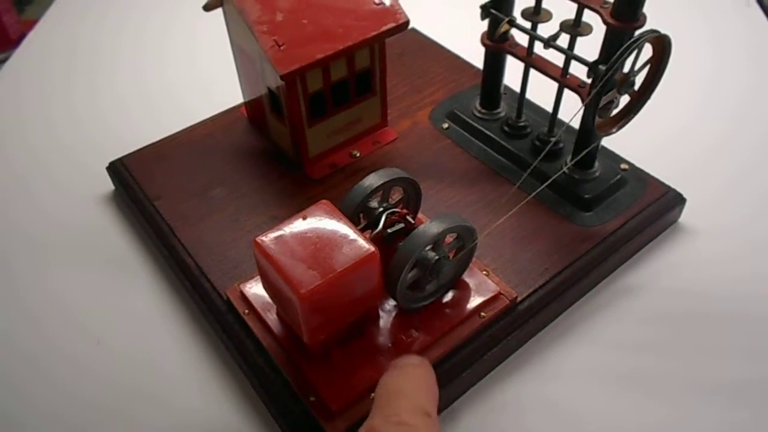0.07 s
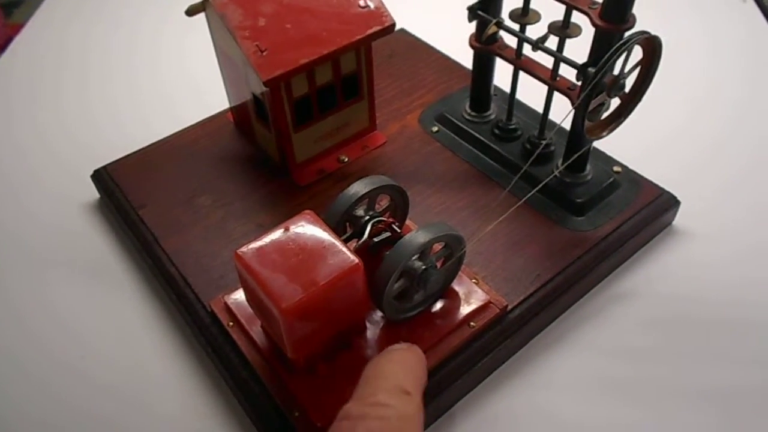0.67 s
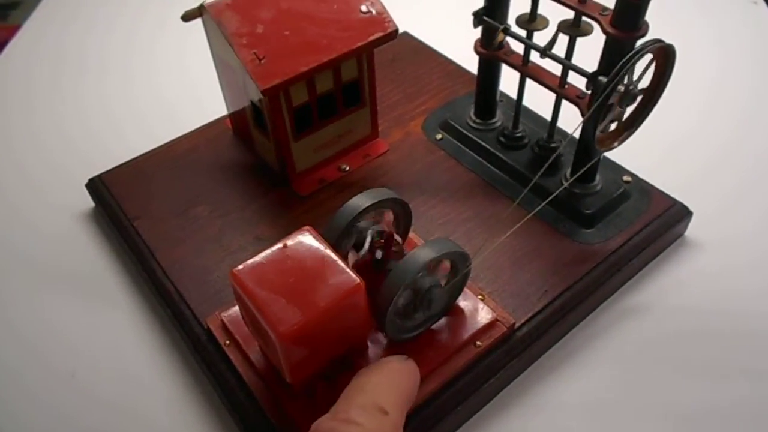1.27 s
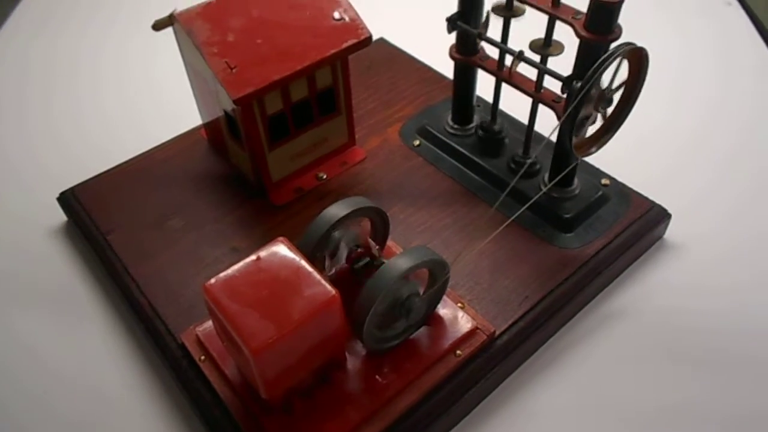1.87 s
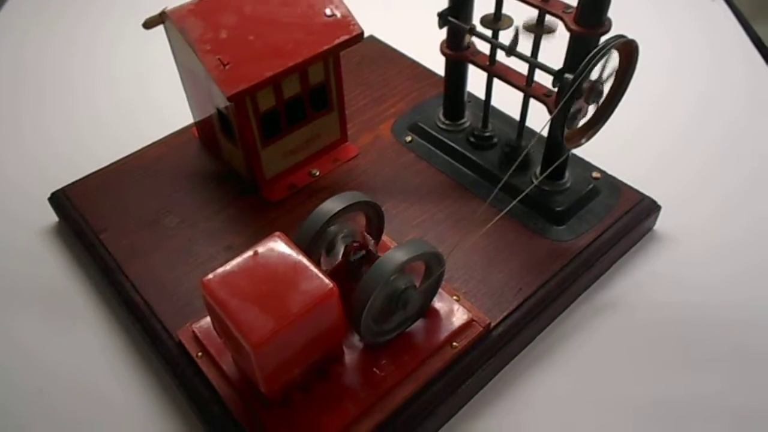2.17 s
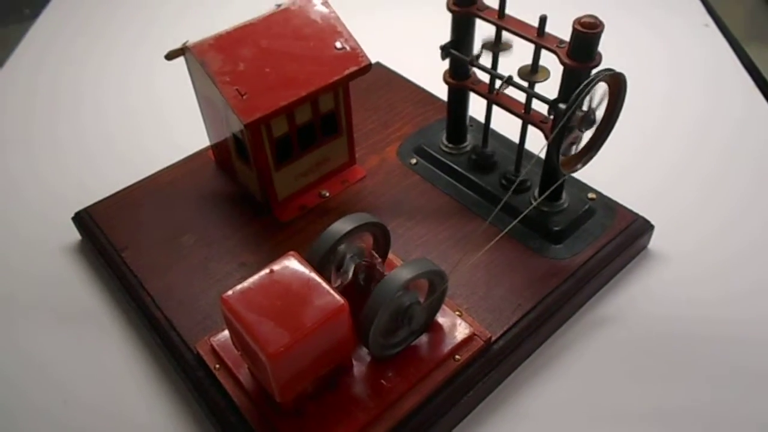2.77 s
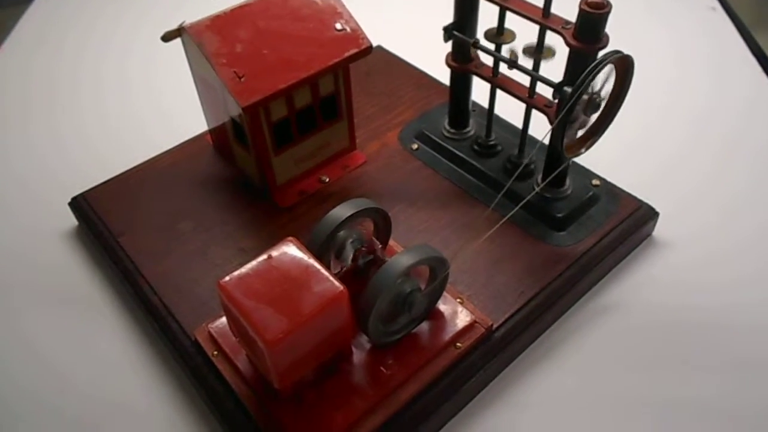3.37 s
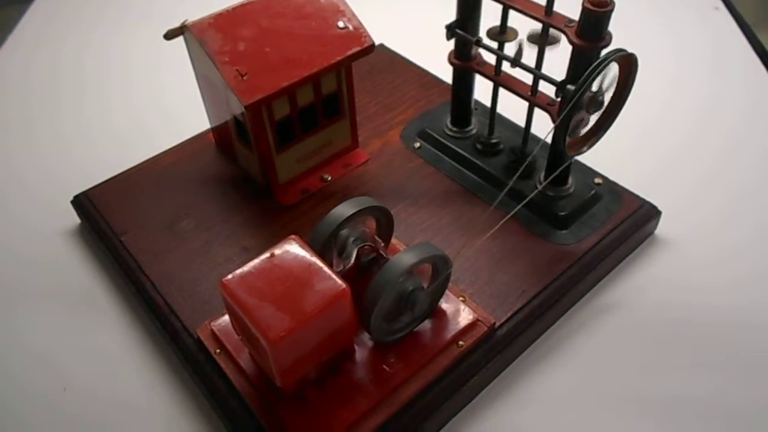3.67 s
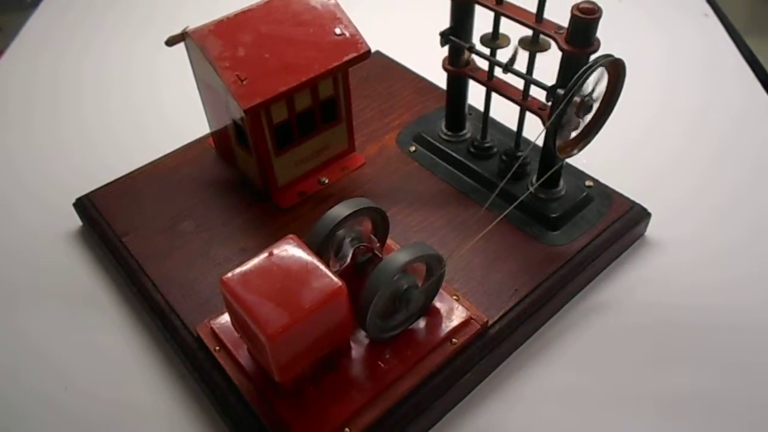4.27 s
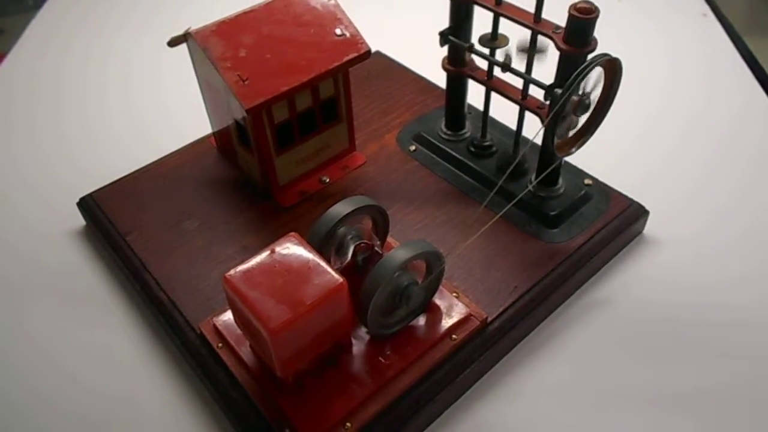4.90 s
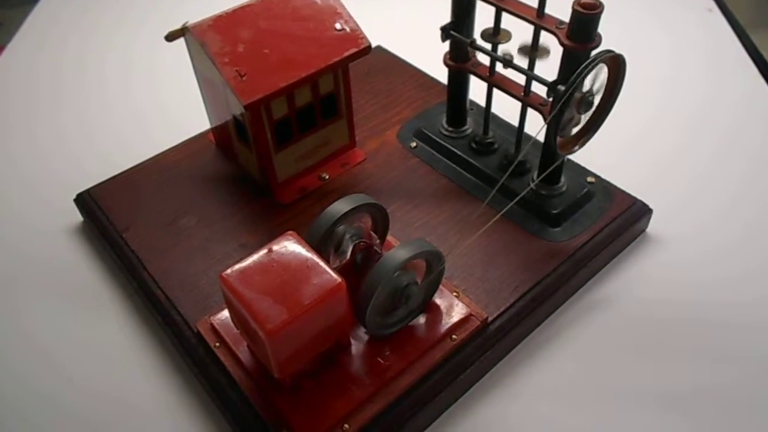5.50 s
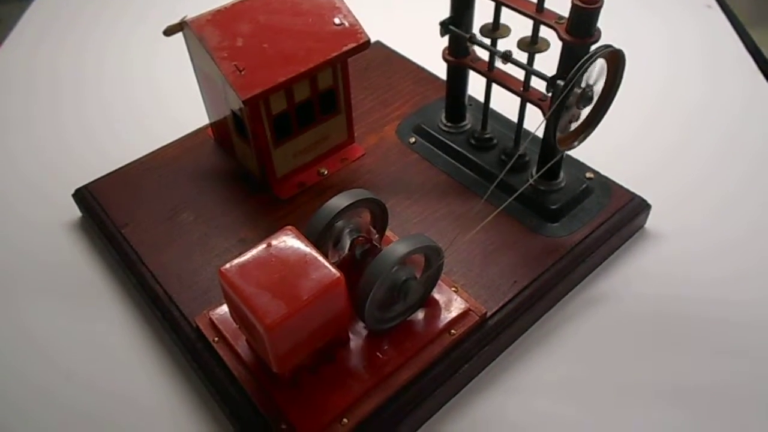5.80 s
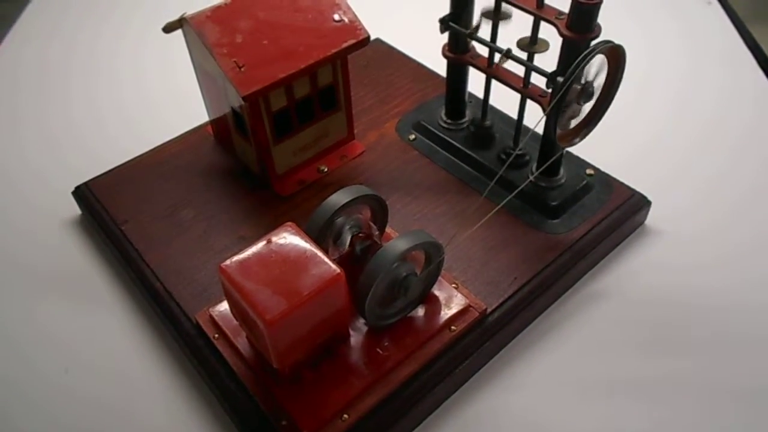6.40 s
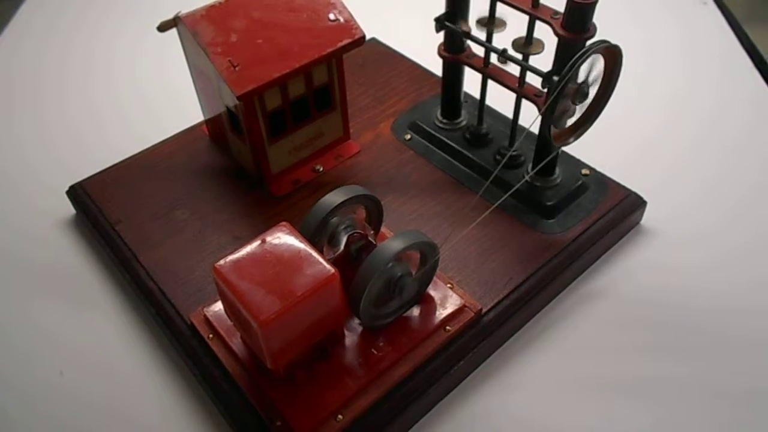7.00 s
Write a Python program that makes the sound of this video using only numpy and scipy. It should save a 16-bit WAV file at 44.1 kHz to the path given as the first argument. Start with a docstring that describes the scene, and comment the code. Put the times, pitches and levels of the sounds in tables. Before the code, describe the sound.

Faint handling scrapes come first, then a sharp metal snap and a second one with a short clatter. A small toy motor starts ticking and accelerates until its clacks merge into a rapid, even rattle of loose metal parts over a low wooden thrum. Tiny hammers tap and bounce along with it. The microphone is close, in a quiet little room with a slight hum.

```python
"""Toy solenoid motor and stamp mill.

A tin motor on a wooden board is switched on, nudged, and runs up to about 30 strokes a second.
Each stroke clacks the armature and thumps the board; with speed the slack crank knocks just ahead
of the clack and loose links rattle. A belt drives a stamp mill whose two hammers drop in turn and
bounce. Small quiet room, faint mains hum."""
import sys
import numpy as np
from scipy import signal
from scipy.fft import rfft, irfft
from scipy.io import wavfile

SR = 44100
rng = np.random.default_rng(int(sys.argv[2]) if len(sys.argv) > 2 else 0)


def log_audio(samples):
    """Write samples as a 16-bit WAV file to the path given in sys.argv[1]."""
    # one column per channel
    frames = np.atleast_2d(samples).T
    # limit to full scale, then quantise
    limited = np.clip(frames, -1, 1)
    pcm = np.round(limited * 32767).astype(np.int16)
    wavfile.write(sys.argv[1], SR, pcm)


N = 319725

# room air spectrum: f/Hz, level/dB
AIR_SPECTRUM = [(12, -35), (20, 2.5), (40, 6.5), (60, 0), (85, -9), (130, -16), (200, -12.5), (464, -17),
                (1190, -25.5), (2730, -29.5), (5960, -31), (9930, -34), (12300, -72), (16000, -102)]
# room decay: f/Hz, t60/s
ROOM_DECAY = [(150, 0.75), (1500, 0.15), (5000, 0.12), (11000, 0.053)]
# wooden board modes: f/Hz, level/dB, t60/s
BOARD_MODES = [(110.6, 3, 0.16), (141, -20.5, 0.23), (162.6, -8, 0.17), (200, -5, 0.094), (239, -9.5, 0.14),
               (292, -23, 0.45), (426, -9.5, 0.051), (557, -4.5, 0.03)]
# short scrapes, then the gritty clatter of the first hammer drop: t/s, length/s, level/dB
GRIT_BURSTS = [(0.233, 0.054, -57), (0.382, 0.028, -55), (1.21, 0.018, -37.5), (1.405, 0.041, -46.5),
               (1.464, 0.033, -36.5), (1.527, 0.12, -45)]
# switch and armature clicks at start-up: t/s, level/dB
START_CLICKS = [(0.188, -38.5), (1.172, -38.5), (1.22, -30), (1.2422, -5), (1.271, -39), (1.312, -39),
                (1.5212, -4)]
# switch lever in its housing, also colours the grit: f/Hz, level/dB
LEVER_SPECTRUM = [(70, -23), (160, 14), (300, 4.5), (450, 5), (800, -4.5), (1200, -6), (1450, -8),
                  (1800, -0.5), (3000, -1.5), (5000, -7.5), (7500, -5.5), (10200, -12), (11000, -26),
                  (12600, -51)]
# mill hammers: first release/strokes, fall/s, level/dB
MILL_HAMMERS = [(6.597, .036, -10.5), (2.87, .03, -14.5)]
# hammer on anvil: f/Hz, level/dB
HAMMER_SPECTRUM = [(100, -35), (300, -17), (800, -19), (1150, -12), (1450, -13), (1900, 1.5), (2800, 1.5),
                   (3600, -4), (5500, -7.5), (7500, -13), (10200, -16), (11000, -35), (12600, -52)]
# flywheel run-up from the first stroke: t/s, stroke rate/Hz
RUN_UP = [(1.679, 7.471), (1.8, 9.243), (1.95, 11.366), (2.15, 13.886), (2.4, 16.244), (2.7, 18.913),
          (3.0, 21.23), (3.4, 23.295), (3.8, 24.348), (4.2, 25.069), (4.6, 25.889), (5.0, 26.338),
          (5.5, 27.357), (6.0, 27.999), (6.6, 28.7), (7.25, 29.504)]
# drive strength, common to all motor blows: t/s, level/dB
DRIVE_LEVEL = [(1.68, 1.5), (2.15, -1.5), (2.5, 1.5), (3.4, 1), (3.8, 0), (4.65, 2.5), (4.85, -1.5),
               (5.5, -1.5), (7.2, 0)]
# belt and bearings: f/Hz, level/dB
RUMBLE_SPECTRUM = [(20, 6), (55, -5.5), (75, -19), (130, -16.5), (200, -1.5), (350, -13.5), (600, -9.5),
                   (800, -13.5), (2000, -22.5), (5000, -19.5), (10000, -20), (12000, -60)]
# loose link tick: f/Hz, level/dB
LINK_SPECTRUM = [(70, -33), (150, 11), (300, 8.5), (480, -4), (800, -6.5), (1200, -5.5), (1700, -0.5),
                 (2600, -6.5), (3700, -4), (5500, -10), (7500, -5.5), (10200, -17.5), (11000, -17),
                 (12600, -30)]
# crank in its bearing: f/Hz, level/dB
KNOCK_SPECTRUM = [(100, -78), (500, -14), (800, -32), (1400, -19.5), (2100, -6), (3600, -6.5), (4200, -0.5),
                  (5200, -1), (6800, -4), (8000, -2), (10300, -21), (11000, -17.5), (11800, -30),
                  (12600, -29)]
# metal frame modes: f/Hz, level/dB, t60/s
FRAME_MODES = [(1984, -4, 0.078), (2130, 1, 0.04), (2940, -45, 0.041), (3195, 5.5, 0.034), (4180, 9, 0.017),
               (4100, 1.5, 0.048), (4800, -36, 0.03), (4698, -2.5, 0.063), (5740, -4, 0.067),
               (8640, 6.5, 0.019), (10100, -1, 0.02)]
# tin base modes: f/Hz, level/dB, t60/s
BASE_MODES = [(334, -27, 0.035), (447, -10, 0.067), (546, -1, 0.086), (586, 0.5, 0.032),
              (629.3, -0.5, 0.069), (1019, -12.5, 0.094), (1119, 0, 0.031)]
# armature on magnet: f/Hz, level/dB
CLACK_SPECTRUM = [(100, -58), (350, -12.5), (900, -13.5), (1500, -13.5), (2800, -10), (4300, -10),
                  (5300, -5.5), (6300, 2), (7400, -14), (8200, -13), (8950, 3), (9600, -1.5), (10300, 2),
                  (11000, -34.5), (11800, -19), (12600, -36)]


def amp(db):
    """dB to gain."""
    return 10 ** (np.asarray(db) / 20)


def unit_rms(x):
    """x at rms 1."""
    return x / np.sqrt(np.mean(x ** 2) + 1e-20)


def at_hz(table, hz):
    """Table value on a log frequency axis."""
    table_hz, values = np.transpose(table)
    return np.interp(np.log(hz + 1), np.log(table_hz + 1), values)


def at_time(table, times_s):
    """Table value on a linear time axis."""
    return np.interp(times_s, *np.transpose(table))


def coloured(x, spectrum):
    """x through a minimum-phase filter of unit power."""
    size = 8192
    gain = unit_rms(amp(at_hz(spectrum, np.fft.rfftfreq(size, 1 / SR))))
    cepstrum = irfft(np.log(gain))
    cepstrum[1:size // 2] *= 2
    cepstrum[size // 2 + 1:] = 0
    impulse = irfft(np.exp(rfft(cepstrum)))
    return signal.fftconvolve(x, impulse)[:N]


def place(times_s, shapes):
    """Sum of the rows of shapes, one starting at each time."""
    starts = np.round(np.maximum(times_s, 0) * SR).astype(int)
    index = starts[:, None] + np.arange(shapes.shape[1])
    return np.bincount(index.ravel(), shapes.ravel(), N)[:N]


def contacts(times_s, db, spectrum, rise_s, t60_s, ring_db, ring_t60_s, alike):
    """Blows on densely ringing metal: a crack (power share `alike` repeats) and a weaker diffuse ring."""
    t = np.arange(SR // 8) / SR
    own = rng.standard_normal((len(times_s), len(t)))
    common = rng.standard_normal(len(t))
    crack = amp(-60 * t / t60_s) * (np.sqrt(alike) * common + np.sqrt(1 - alike) * own)
    ring = amp(ring_db - 60 * t / ring_t60_s) * rng.standard_normal(own.shape)
    attack = 1 - np.exp(-t / rise_s)
    return coloured(place(times_s, amp(db)[:, None] * attack * (crack + ring)), spectrum)


def struck(times_s, db, modes, scatter_db):
    """Blows on damped modes; each mode's strength scatters per blow."""
    t = np.arange(SR // 3) / SR
    hz, mode_db, t60_s = np.transpose(modes)[:, :, None]
    rings = amp(mode_db - 60 * t / t60_s) * np.sin(2 * np.pi * hz * t)
    gains = amp(db[:, None] + scatter_db * rng.standard_normal((len(times_s), len(modes))))
    return place(times_s, gains @ rings)


def background(t):
    """Room air, thin high hiss, mains hum."""
    hiss_hz, hum_hz = 5880, 120
    air = amp(-50) * unit_rms(coloured(rng.standard_normal(N), AIR_SPECTRUM))
    hiss = amp(-70) * unit_rms(signal.lfilter(*signal.iirpeak(hiss_hz, 25, SR), rng.standard_normal(N)))
    hum = amp(-53) * np.sin(2 * np.pi * hum_hz * t)
    return air + hiss + hum


def room(x):
    """Wall reflections: a short diffuse tail, treble dying first."""
    hz, t, noise = signal.stft(rng.standard_normal(SR // 2), SR, nperseg=256)
    decay = amp(-60 * t / at_hz(ROOM_DECAY, hz)[:, None])
    _, tail = signal.istft(noise * decay, SR, nperseg=256)
    tail = signal.sosfilt(signal.butter(2, 350, 'high', fs=SR, output='sos'), tail)
    delayed = np.pad(tail, (SR // 200, 0)) / np.linalg.norm(tail)
    return signal.fftconvolve(x, delayed)[:N]


def board(times_s, db):
    """Board thumps; too small to radiate deep bass."""
    low_cut = signal.butter(6, 95, 'high', fs=SR, output='sos')
    return signal.sosfilt(low_cut, struck(times_s, db, BOARD_MODES, scatter_db=1.04))


def scrapes_and_clatter(t):
    """Short scrapes, then the gritty clatter of the first hammer drop; each swells, holds, dies away."""
    attack_s, t60_s = .0097, .13
    envelope = np.zeros(N)
    for start_s, length_s, db in GRIT_BURSTS:
        attack = np.clip((t - start_s) / attack_s, 0, 1)
        since_end_s = np.maximum(t - start_s - length_s, 0)
        envelope += attack * amp(db - 60 * since_end_s / t60_s)
    grit = rng.standard_normal(N) * rng.exponential(size=N)
    return envelope * unit_rms(coloured(grit, LEVER_SPECTRUM))


def start_up(t):
    """The lever clicks; the armature snaps in, and again at the nudge of the wheel."""
    times_s, db = np.transpose(START_CLICKS)
    lever = contacts(times_s + .00085, db - 5, LEVER_SPECTRUM,
                     rise_s=.00021, t60_s=.027, ring_db=-16, ring_t60_s=.11, alike=.1)
    return armature(times_s, db) + lever + board(times_s, db - 27) + scrapes_and_clatter(t)


def bouncing(drops, count):
    """Contact times and levels per drop: each flight shorter, each blow weaker."""
    restitution, loss_db = .63, 5.5
    landing_s, fall_s, db = np.transpose(drops)[:, :, None]
    bounce = np.arange(count)
    flown_s = 2 * fall_s * restitution * (1 - restitution ** bounce) / (1 - restitution)
    return (landing_s + flown_s).ravel(), (db - loss_db * bounce).ravel()


def stamp_mill(t, turns):
    """Cams release the hammers in turn; they hit their anvils, bounce and shake the board."""
    strokes_per_cam_turn = 7.7763
    drops = [(1.5229, .033, 0)]  # a raised hammer drops at the nudge: t/s, fall/s, level/dB
    for first_stroke, fall_s, hammer_db in MILL_HAMMERS:
        release_turns = np.arange(first_stroke, turns[-1], strokes_per_cam_turn)
        releases_s = t[np.searchsorted(turns, release_turns)]
        drops += [(release_s + fall_s, fall_s, hammer_db) for release_s in releases_s]
    times_s, db = bouncing(drops, count=7)
    db = db + rng.standard_normal(len(db))
    blows = contacts(times_s, db, HAMMER_SPECTRUM,
                     rise_s=.00057, t60_s=.02, ring_db=-19, ring_t60_s=.06, alike=.035)
    return blows + board(times_s, db - 35)


def flywheel(t):
    """Stroke rate and turns made, one stroke a turn."""
    rate_hz = at_time(RUN_UP, t)
    running = t >= RUN_UP[0][0]
    return rate_hz, np.cumsum(rate_hz * running) / SR


def belt_rumble(rate_hz, turns):
    """Belt and bearing noise, growing with speed squared."""
    envelope = amp(-38.5) * (rate_hz / rate_hz[-1]) ** 2 * (turns > 0)
    return envelope * unit_rms(coloured(rng.standard_normal(N), RUMBLE_SPECTRUM))


def rocking(rate_hz, turns):
    """The off-centre mass rocks the board on its feet, once and twice a turn."""
    resonance_hz, q = 42.7, 4.7
    sway = np.zeros(N)
    for harmonic, db in [(1, -43), (2, -53.5)]:
        ratio = harmonic * rate_hz / resonance_hz
        response = ratio ** 2 / np.hypot(1 - ratio ** 2, ratio / q)
        sway += amp(db) * response * np.sin(2 * np.pi * harmonic * turns)
    return np.sqrt(2) * sway


def loose_db(rate_hz, onset_hz, steepness):
    """Level of a part that works loose with speed: -6 dB at onset, 0 dB far above."""
    return -20 * np.log10(1 + (onset_hz / rate_hz) ** steepness)


def links(t, rate_hz, turns):
    """Loose links tick at random once speed shakes them free."""
    ticks_per_turn, spread_db = 10, 4.5
    at = np.searchsorted(turns, rng.uniform(0, turns[-1], ticks_per_turn * int(turns[-1])))
    db = at_time(DRIVE_LEVEL, t[at]) - 31.5 + loose_db(rate_hz[at], onset_hz=10.9, steepness=11)
    db += spread_db * rng.standard_normal(len(at))
    return contacts(t[at], db, LINK_SPECTRUM,
                    rise_s=.0014, t60_s=.017, ring_db=-10, ring_t60_s=.03, alike=.079)


def crank(times_s, db):
    """The slack crank knocks in its bearing, rebounds, and rings frame and tin base."""
    rebound_s = times_s + .000999 + .0017 * rng.random(len(times_s))
    rebound_db = db + 1 - 10 * rng.random(len(times_s))
    knocks = contacts(np.r_[times_s, rebound_s], np.r_[db, rebound_db], KNOCK_SPECTRUM,
                      rise_s=.0004, t60_s=.015, ring_db=-19, ring_t60_s=.08, alike=.06)
    frame = struck(times_s, db - 19.5, FRAME_MODES, scatter_db=4)
    base = struck(times_s, db - 21, BASE_MODES, scatter_db=.7)
    return knocks + frame + base


def armature(times_s, db):
    """The iron armature slaps the magnet."""
    return contacts(times_s, db, CLACK_SPECTRUM,
                    rise_s=.00015, t60_s=.012, ring_db=-24, ring_t60_s=.03, alike=.18)


def motor(t, rate_hz, turns):
    """Per stroke: crank knock, then clack and thump; force follows drive and speed."""
    cruise_hz = 24.1
    slack_s, tight_hz = .0243, 31.8  # knock's lead at rest; rate at which it would vanish
    clack_spread_db, knock_spread_db = .6, 1.8  # the magnet pulls evenly, the loose crank does not
    at = np.searchsorted(turns, np.arange(np.ceil(turns[-1])), side='right')
    strokes_s, stroke_hz = t[at], rate_hz[at]
    drive_db = at_time(DRIVE_LEVEL, strokes_s)
    octaves = np.log2(stroke_hz / cruise_hz)
    clack_db = drive_db - 12.5 - 3.5 * octaves  # less time to pull at speed
    thump_db = drive_db - 28.5 - 2.5 * octaves
    knock_db = drive_db - 11 + loose_db(stroke_hz, onset_hz=22.16, steepness=6.2)
    clack_jitter, lead_jitter, knock_jitter = rng.standard_normal((3, len(at)))
    lead_s = slack_s * (1 - stroke_hz / tight_hz) * (1 + .08 * lead_jitter)
    clacks = armature(strokes_s, clack_db + clack_spread_db * clack_jitter)
    knocks = crank(strokes_s - lead_s, knock_db + knock_spread_db * knock_jitter)
    rumble = belt_rumble(rate_hz, turns)
    thumps = board(strokes_s, thump_db)
    return clacks + thumps + knocks + links(t, rate_hz, turns) + rocking(rate_hz, turns) + rumble


def scene():
    """The toy, close up in its room; mono."""
    t = np.arange(N) / SR
    rate_hz, turns = flywheel(t)
    toy = motor(t, rate_hz, turns) + stamp_mill(t, turns) + start_up(t)
    return (toy + amp(-13.5) * room(toy) + background(t))[None]


def record(dry):
    """Soft peak limit, then a steep low-pass."""
    ceiling, top_hz = .7, 12462
    rounded = dry / (1 + np.abs(dry / ceiling) ** 4) ** (1 / 4)
    return signal.sosfilt(signal.cheby1(12, .1, top_hz, fs=SR, output='sos'), rounded)


dry = scene()
out = record(dry)
log_audio(out)
```